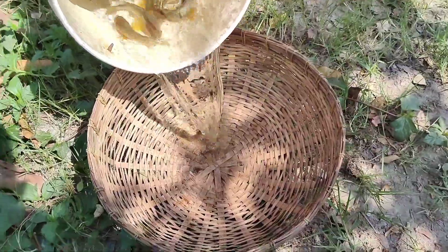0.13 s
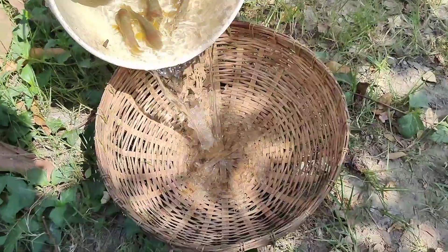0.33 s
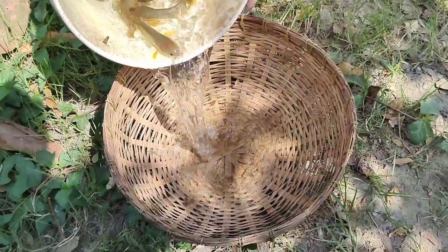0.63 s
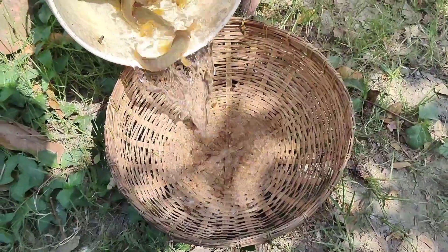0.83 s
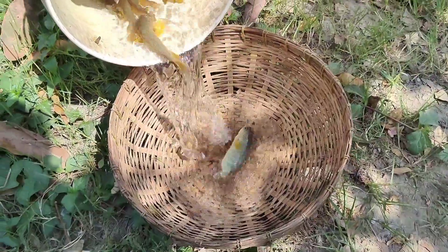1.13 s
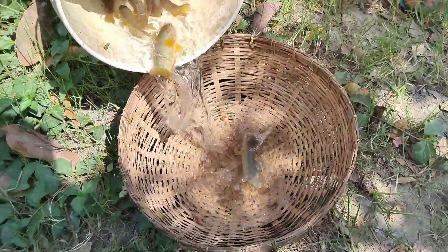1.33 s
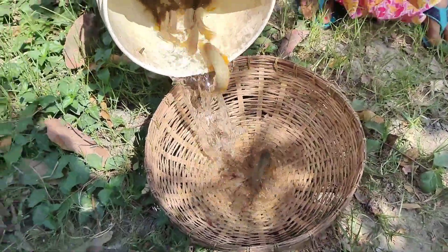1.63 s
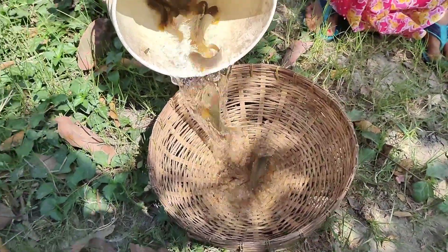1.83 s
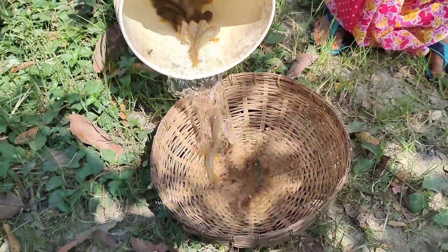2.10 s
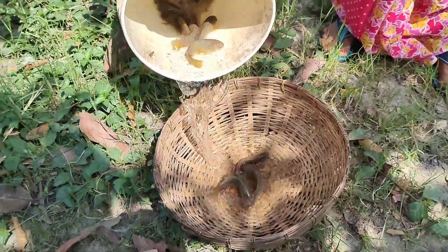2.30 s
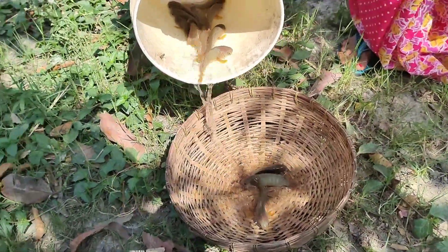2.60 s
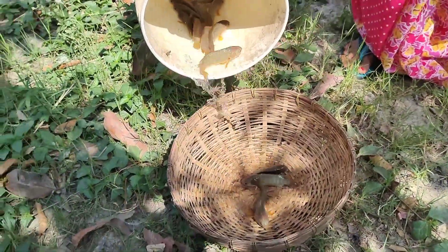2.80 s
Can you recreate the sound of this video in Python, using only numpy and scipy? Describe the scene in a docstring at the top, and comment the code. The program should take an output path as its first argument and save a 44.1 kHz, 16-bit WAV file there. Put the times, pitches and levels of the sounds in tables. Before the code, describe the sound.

Water with small fish is poured into a wicker basket outdoors: a few ticks, then lumpy splashing, crackling spray, gurgles and wet slaps, fading to drips; close, dry stereo, with the right side brighter and ringing.

```python
"""Water and small live fish are tipped from a plastic bucket into a woven basket outdoors.
First a faint thin tone and a few ticking drops; then a swarm of pulsating bubbles makes the stream.
Spray crackles and hisses on the wicker, larger bubbles gurgle, and fish slap down as noise bursts.
The pour thins to ticks and ringing drips. Throughout, the ground echoes once and light air rumbles;
the right microphone port rings near 2.7 kHz."""
import sys
import numpy as np
from scipy import signal
from scipy.fft import rfft, irfft, next_fast_len
from scipy.io import wavfile
from scipy.ndimage import map_coordinates

SR = 44100
rng = np.random.default_rng(int(sys.argv[2]) if len(sys.argv) > 2 else 0)


def digitize_waveform(pressure):
    """Quantize a signal to 16-bit integers and store it at the path in sys.argv[1].

    Rows of a 2-D input are taken as channels; values are limited to [-1, 1].
    """
    field = np.atleast_2d(pressure).T
    bounded = np.clip(field, -1, 1)
    quanta = np.round(bounded * 32767).astype(np.int16)
    wavfile.write(sys.argv[1], SR, quanta)


N = 130095  # samples in the scene


def amp(db):
    """Level law: decibels to an amplitude factor."""
    return 10 ** (np.asarray(db) / 20)


def unit(x):
    """Energy normalisation: scale to rms 1."""
    return x / np.sqrt(np.mean(x ** 2) + 1e-20)


def curve(rows):
    """Linear interpolation of (seconds, value) rows, one value per sample."""
    seconds, values = np.transpose(rows)
    return np.interp(np.arange(N) / SR, seconds, values)


def wobble(rate):
    """Random modulation: a smooth spline through random knots, rate knots a second."""
    knots = rng.standard_normal(int(N * rate / SR) + 4)
    return map_coordinates(knots, [np.arange(N) * rate / SR])


def coloured(x, points, delay=0):
    """Minimum-phase filtering by (Hz, dB) points through the folded cepstrum, then a delay in seconds."""
    size = 2 * next_fast_len(N // 2 + SR // 10)
    hz = np.fft.rfftfreq(size, 1 / SR)
    point_hz, point_db = np.transpose(points)
    gain_db = np.interp(np.log(hz + 1), np.log(point_hz), point_db)
    cepstrum = irfft(np.log(amp(gain_db)))
    # Folding the negative times onto the positive ones makes the filter causal.
    cepstrum[1:size // 2] *= 2
    cepstrum[size // 2 + 1:] = 0
    response = np.exp(rfft(cepstrum) - 2j * np.pi * hz * delay)
    return irfft(rfft(x, size) * response, size)[..., :N]


def noise(points, side_db):
    """Partial coherence: rms-1 stereo noise, less alike at the two ports as side_db grows."""
    mid, side = coloured(rng.standard_normal((2, N)), points)
    side = amp(side_db) * side
    return unit(np.array([mid + side, mid - side]))


LAG_SCATTER_S = 0.00004  # spread of the arrival difference between the ports, from bubble to bubble
RISE = 0.024  # share by which a bubble's pitch rises in one swell time


def ring(start, gain, hz, swell, size):
    """Bubble pulsation: rising sines swell and die away, reaching the two ports at scattered moments."""
    half_lag = LAG_SCATTER_S * rng.standard_normal(len(start)) / 2
    samples = np.arange(size)
    index = (start * SR).astype(int)[:, None] + samples
    ports = []
    for shift in (half_lag, -half_lag):
        t = np.maximum(samples / SR + shift[:, None], 0)
        u = np.minimum(t / swell[:, None], 10)  # time in swell times
        envelope = gain[:, None] * u * np.exp((1 - u * u) / 2)  # peaks at u = 1
        wave = envelope * np.sin(2 * np.pi * hz[:, None] * t * (1 + RISE * u / 2))
        ports.append(np.bincount(index.ravel(), wave.ravel(), N)[:N])
    return np.array(ports)


def swarm(points, count, centre_hz, spread, cycles, scatter_db, size):
    """Random superposition: bubbles of scattered time, strength, length and pitch, filtered to rms 1."""
    when, pitch, strength, life = rng.random((count, 4)).T
    hz = np.clip(centre_hz * np.exp(spread * (2 * pitch - 1)), 100, SR / 2)
    gain = amp(scatter_db * strength ** 2) * np.sqrt(hz)
    swell = cycles * (.5 + life) / hz
    bubbles = ring(when * N / SR, gain, hz, swell, size)
    return unit(coloured(bubbles, points))


def burst(rows, attack):
    """Impact envelope: each (s, dB, decay s) contact rises exponentially and decays exponentially."""
    out, t = np.zeros(N + SR), np.arange(SR // 3) / SR
    for start, db, decay in rows:
        rise = 1 - np.exp(-t / attack)
        fall = np.exp(-np.minimum(t / decay, 20))
        out[int(start * SR):][:len(t)] += amp(db) * rise * fall
    return out[:N]


# Strength of the stream. Each row: time in seconds, level in dB before the flutter and layer mix.
STREAM_LEVEL = [(0, -59), (.13, -52), (.205, -48), (.24, -32.5), (.34, -32), (.43, -33), (.468, -49.5),
                (.495, -30), (.62, -32.5), (.67, -27.5), (.76, -36.5), (.82, -35), (.87, -50.5),
                (.915, -42), (.95, -37), (1.03, -34.5), (1.07, -32.5), (1.11, -32), (1.24, -33),
                (1.49, -32.5), (1.6, -41.5), (1.72, -34.5), (1.78, -33), (1.85, -43.5), (1.89, -25),
                (1.96, -35), (2.1, -33.5), (2.17, -32), (2.29, -32.5), (2.34, -45), (2.49, -41.5),
                (2.58, -54), (2.9, -60.5)]
# Spectrum of the stream. Each row: frequency in Hz, relative level in dB.
STREAM_SPECTRUM = [(200, -26), (900, -30.5), (1300, -10.5), (1650, -5), (2150, -2), (2600, 1.5),
                   (3200, -0.5), (4500, -7), (7000, -20.5), (15000, -49)]


def stream():
    """Bubble entrainment: falling water is a swarm of brief bubbles over a soft wash, arriving in lumps."""
    bubbles = swarm(STREAM_SPECTRUM, count=2900, centre_hz=2587, spread=0.595, cycles=2.65,
                    scatter_db=13, size=320)
    wash = noise(STREAM_SPECTRUM, side_db=-1)
    level = amp(curve(STREAM_LEVEL) + 1.5 * wobble(80))
    return level * (amp(-2.5) * bubbles + amp(-7.5) * wash)


# Strength of the spray. Each row: time in seconds, level in dB before the flutter and layer mix.
SPRAY_LEVEL = [(0, -66), (.11, -73), (.22, -51), (.46, -51.5), (.5, -48), (.8, -45), (.85, -51), (.91, -52),
               (.98, -41.5), (1.16, -44), (1.21, -44), (1.37, -44), (1.41, -37), (1.48, -39), (1.52, -49),
               (1.62, -47), (1.7, -43), (1.8, -45.5), (1.93, -45.5), (2.05, -41.5), (2.42, -49),
               (2.58, -54), (2.7, -54), (2.78, -65.5), (2.92, -65.5)]
# Spectrum of the spray. Each row: frequency in Hz, relative level in dB.
SPRAY_SPECTRUM = [(800, -7), (2500, -20), (4800, -3.5), (6000, -2.5), (7800, -11.5), (10000, -8.5),
                  (12500, -16), (15000, -37)]


def spray():
    """Size-pitch scaling: fine droplets crackle on the weave as short high rings over a hiss."""
    crackle = swarm(SPRAY_SPECTRUM, count=3600, centre_hz=7250, spread=0.768, cycles=2.74,
                    scatter_db=9.5, size=130)
    hiss = noise(SPRAY_SPECTRUM, side_db=-1)
    level = amp(curve(SPRAY_LEVEL) + 2.8 * wobble(70))
    return level * (amp(3) * crackle + amp(.5) * hiss)


# Strength of the gurgle. Each row: time in seconds, level in dB before the layer mix.
GURGLE_LEVEL = [(0, -66), (.46, -60.5), (.56, -47.5), (.66, -45), (.76, -47), (.9, -61), (1.03, -41.5),
                (1.24, -45), (1.4, -50.5), (1.62, -57.5), (1.72, -41.5), (1.79, -47.5), (2.0, -51.5),
                (2.07, -47), (2.14, -48), (2.45, -52), (2.7, -60), (2.92, -62)]
# Spectrum of the gurgle. Each row: frequency in Hz, relative level in dB.
GURGLE_SPECTRUM = [(120, -4), (250, -25), (400, -15.5), (750, -2.5), (900, -4), (1130, 3), (1550, 7),
                   (1900, -5), (2600, -15.5)]


def gurgle():
    """Size-pitch scaling: larger, lower bubbles where water pools on the bottom before it drains."""
    glugs = swarm(GURGLE_SPECTRUM, count=650, centre_hz=1311, spread=0.469, cycles=4.6,
                  scatter_db=16, size=1000)
    slosh = noise(GURGLE_SPECTRUM, side_db=-59)
    return amp(curve(GURGLE_LEVEL)) * (amp(1) * glugs + amp(-0.5) * slosh)


# Loud single bubbles and drips.
# Each row: start in seconds, envelope peak in dB, starting pitch in Hz, swell time in seconds.
SINGLE_BUBBLES = [(.243, -29.5, 1830, 0.007), (0.2827, -24, 2560, .001), (.329, -32, 1660, 0.0035),
                  (0.342, -28, 1508, 0.0055), (0.3682, -20, 2630, 0.0019), (.3785, -17, 2360, .001),
                  (.3828, -15.5, 2020, 0.0017), (0.4187, -17.5, 2640, 0.0014), (0.4894, -22, 2740, 0.0016),
                  (.509, -15.5, 2080, 0.00064), (0.521, -14.5, 2320, 0.001), (0.523, -16, 2720, .0009),
                  (0.5575, -19.5, 2580, .0009), (0.5407, -23, 2550, 0.0016), (.555, -20.5, 1640, 0.0026),
                  (.578, -36, 1460, 0.0073), (0.682, -35.5, 1085, .005), (0.754, -29.5, 1570, 0.0025),
                  (1.047, -31, 1550, 0.0018), (1.15, -22.5, 1450, 0.002), (1.244, -20.5, 1720, 0.0017),
                  (1.633, -29.5, 1125, .002), (1.298, -29.5, 1530, 0.0035), (1.327, -29, 1470, .003),
                  (0.592, -28, 1320, 0.0062), (.6019, -17.5, 2220, 0.00072), (0.647, -22, 1132, 0.0039),
                  (0.6548, -22, 2630, .001), (0.662, -25, 2500, .001), (0.68, -21, 2600, 0.0016),
                  (.713, -21, 2950, 0.0013), (0.7173, -14, 2880, .0013), (0.731, -27, 2600, 0.0014),
                  (.806, -18.5, 2200, 0.0004), (0.82, -26, 2550, 0.0018), (.848, -26, 2710, 0.0024),
                  (.877, -25, 5000, 0.0011), (.947, -24.5, 2720, 0.0025), (.9553, -18, 2560, 0.00063),
                  (0.9772, -18, 3040, 0.0006), (1.0035, -22, 2850, 0.001), (1.0634, -7.5, 2350, 0.00072),
                  (1.068, -22, 2900, 0.0015), (1.075, -13.5, 2800, 0.00096), (1.1396, -18.5, 2600, .0014),
                  (1.1645, -18.5, 2100, 0.001), (1.2585, -22, 2000, 0.00065), (1.23, -28, 1210, 0.0016),
                  (1.285, -36, 2770, 0.00091), (1.3079, -34, 2670, .0009), (1.3731, -13, 3180, 0.00075),
                  (1.4776, -17, 2610, 0.00084), (1.599, -24.5, 2620, 0.0009),
                  (1.6305, -13.5, 2500, 0.00095), (1.6612, -22, 2940, 0.0014), (1.725, -31, 1010, 0.0064),
                  (1.7558, -18.5, 2500, 0.00086), (1.7726, -17.5, 2360, 0.0005), (1.871, -28, 2840, 0.0008),
                  (1.886, -34.5, 2130, 0.0017), (1.8958, -35, 2460, 0.00069), (1.9223, -26, 2650, .001),
                  (2.1158, -23, 2150, .001), (2.14, -20.5, 2240, 0.00094), (2.1464, -21, 2670, 0.0013),
                  (2.2456, -19, 2510, .001), (2.2877, -25, 2590, 0.0031), (2.378, -47.5, 983, 0.011),
                  (2.430, -38, 2920, 0.00089), (2.6255, -33, 3240, 0.0027), (2.676, -24.5, 2765, 0.0027),
                  (2.681, -25, 2840, 0.0011), (2.685, -34, 2840, 0.002), (2.7406, -34, 4290, 0.0033),
                  (2.7438, -35.5, 3120, 0.0038)]


def plops():
    """Free resonance: the loud single bubbles and the last drips each ring at their own pitch."""
    start, db, hz, swell = np.transpose(SINGLE_BUBBLES)
    return ring(start, amp(db), hz, swell, size=2000)


# Fish and lumps of water slapping the wicker.
# Each row: start in seconds, strength in dB before the attack and mix, decay time in seconds.
SLAP_HITS = [(1.0192, -19.5, 0.0029), (1.0582, -13, 0.0029), (1.0858, -12.5, 0.0014),
             (1.5538, -16.5, 0.0038), (1.6298, -19.5, 0.0036), (1.6834, -10, 0.0014), (1.6936, -16, 0.0044),
             (1.76, -23.5, 0.0055), (1.8695, -21, 0.005), (2.038, -37, 0.0013), (2.0602, -21, 0.0024),
             (2.4285, -25.5, 0.0043)]
# Spectrum of a slap. Each row: frequency in Hz, relative level in dB.
SLAP_SPECTRUM = [(100, -17), (400, -19), (800, -8.5), (1100, -9.5), (1500, 2), (2300, 6.5), (4500, 4),
                 (8000, -14.5), (10500, -14.5), (15000, -20)]


def slaps():
    """Impact noise: fish and lumps of water hit the wicker in short decaying bursts."""
    return amp(3) * burst(SLAP_HITS, attack=0.0006) * noise(SLAP_SPECTRUM, side_db=-19.5)


SMACK_DELAY_S, SMACK_DB = 0.00036, 0.5  # lag after the slap's start; peak relative to the strongest slap row


def smacks():
    """Impulse response: each slap opens with one sharp pressure pulse of first contact."""
    start, db, _ = np.transpose(SLAP_HITS)
    index = ((start + SMACK_DELAY_S) * SR).astype(int)
    pulses = coloured(np.bincount(index, amp(db), N)[:N], SLAP_SPECTRUM)
    return amp(db.max() + SMACK_DB) * pulses / np.abs(pulses).max()


# Drops ticking on the canes. Each row: start in seconds, strength in dB before the attack.
DROP_TICKS = [(0.048, -41), (0.1415, -35.5), (.194, -49), (0.4357, -30.5), (0.49, -29), (.735, -30),
              (0.7712, -24.5), (0.8041, -24), (0.875, -28), (0.932, -28), (1.127, -25), (1.341, -31),
              (1.3896, -28), (1.478, -22), (1.5999, -25), (1.655, -28), (1.816, -27), (1.835, -26),
              (2.219, -20), (2.2983, -25.5), (2.3644, -34), (2.398, -40), (2.486, -27.5), (2.5295, -29.5),
              (2.5528, -30.5), (2.625, -33.5), (2.6932, -29), (2.7072, -31), (2.8485, -48.5), (2.939, -40),
              (2.946, -33.5)]
# Spectrum of a tick. Each row: frequency in Hz, relative level in dB.
TICK_SPECTRUM = [(700, -21), (1500, -5), (3000, -2), (5200, 8), (8000, -4), (10500, -2), (15000, -18)]
TICK_ATTACK_S, TICK_DECAY_S = 0.00078, 0.0035


def ticks():
    """Impact noise: light drops tick on the canes in brief bright bursts."""
    hits = [(start, db, TICK_DECAY_S) for start, db in DROP_TICKS]
    return burst(hits, TICK_ATTACK_S) * noise(TICK_SPECTRUM, side_db=-3)


# Soft thuds of fish on the basket floor.
# Each row: start in seconds, strength in dB before the attack, decay time in seconds.
FLOOR_THUDS = [(1.058, -40, 0.02), (1.554, -47, 0.0053), (1.63, -54, 0.0078), (1.695, -37.5, 0.037),
               (2.182, -32, 0.019)]
# Spectrum of a thud. Each row: frequency in Hz, relative level in dB.
THUD_SPECTRUM = [(50, -11.5), (110, -2), (200, 3.5), (320, -12.5), (700, -15), (1100, -12), (2000, -24)]


def thuds():
    """Soft impact: a slower contact on the basket floor excites mostly low frequencies."""
    return burst(FLOOR_THUDS, attack=0.0033) * noise(THUD_SPECTRUM, side_db=-30)


# What the ground returns. Each row: frequency in Hz, gain in dB before GROUND_GAIN.
GROUND_COLOUR = [(2500, 4), (9000, -5)]
GROUND_DELAY_S, GROUND_GAIN = 0.001908, 0.14


def ground_echo(x):
    """Specular reflection: one delayed, coloured copy returns from the ground."""
    return GROUND_GAIN * coloured(x, GROUND_COLOUR, GROUND_DELAY_S)


def scatter(x, t60, wet_db):
    """Diffuse reflection: a decaying noise tail stands for faint scatter from bucket and basket."""
    t = np.arange(SR // 5) / SR
    tail = rng.standard_normal((2, len(t))) * amp(-60 * t / t60)
    tail /= np.linalg.norm(tail[0])
    return amp(wet_db) * signal.fftconvolve(x, tail, axes=1)[:, :N]


# Strength of the air. Each row: time in seconds, level in dB before the slow wobble.
BREEZE_LEVEL = [(0, -44.5), (1.0, -44.5), (1.6, -42.5), (2.2, -41.5), (2.6, -42.5), (2.95, -45)]
# Spectrum of the air. Each row: frequency in Hz, relative level in dB.
BREEZE_SPECTRUM = [(20, -0.5), (40, -1), (65, 3), (90, -6), (160, -10), (250, -16), (380, -27), (700, -23),
                   (1500, -39.5), (2800, -50), (5000, -39.5), (15000, -48)]


def breeze():
    """Broadband turbulence: light wind and the far outdoors as slowly wavering, mostly low noise."""
    level = amp(curve(BREEZE_LEVEL) + 1.1 * wobble(8.55))
    return level * noise(BREEZE_SPECTRUM, side_db=-10)


# Strength of the thin tone. Each row: time in seconds, level in dB.
TONE_LEVEL = [(0, -65), (.25, -51), (.7, -77), (2.95, -75)]
# Spectrum of the thin tone. Each row: frequency in Hz, relative level in dB.
TONE_SPECTRUM = [(1500, -77), (2500, -34), (2780, 14), (2880, 5.5), (3150, -45), (5000, -51)]


def thin_tone():
    """Narrow-band noise: a faint thin tone near 2.8 kHz, strongest early on."""
    return amp(curve(TONE_LEVEL)) * noise(TONE_SPECTRUM, side_db=-38)


def scene():
    """Linear superposition: all the water and fish, their reflections and the air."""
    water = stream() + spray() + gurgle() + plops()
    water = water + slaps() + smacks() + ticks() + thuds()
    reflections = ground_echo(water) + scatter(water, t60=.07, wet_db=-14)
    return water + reflections + breeze() + thin_tone()


# Resonance of the right microphone port. Each row: frequency in Hz, gain in dB.
RIGHT_PORT = [(1000, 0), (1500, 2), (1800, 3.5), (2200, 12), (2600, 12), (2950, 13.5), (3300, 10.5),
              (3800, 7), (4300, 0.5), (5500, 1), (6400, -9.5), (7500, -7), (9500, 2.5), (12000, 2.5),
              (14500, 9)]
RIGHT_LAG_S = 0.00012  # the right port hears this much later
TOP_HZ = 15500  # band limit


def record(dry):
    """Port resonance and limiting: the right side lags and rings, peaks clip, the band is cut off."""
    right = coloured(dry[1], RIGHT_PORT, RIGHT_LAG_S)
    pair = np.clip([dry[0], right], -1, 1)
    in_band = np.fft.rfftfreq(N, 1 / SR) < TOP_HZ
    return irfft(rfft(pair) * in_band, N)


dry = scene()
out = record(dry)
digitize_waveform(out)
```